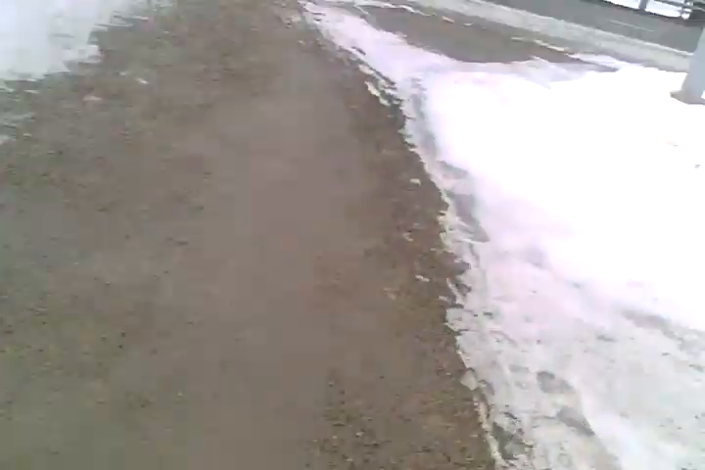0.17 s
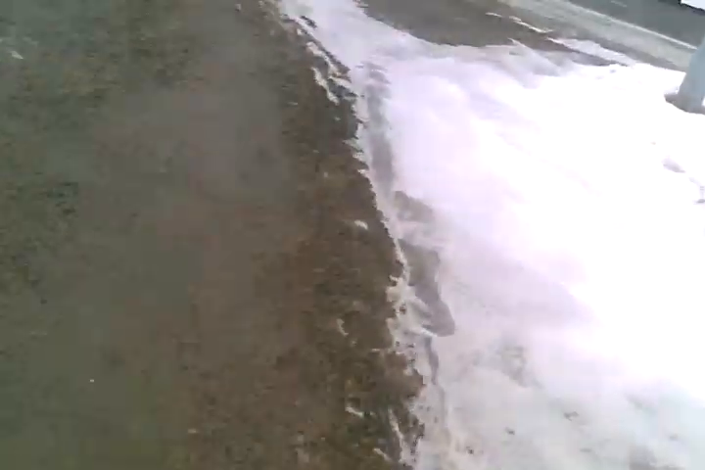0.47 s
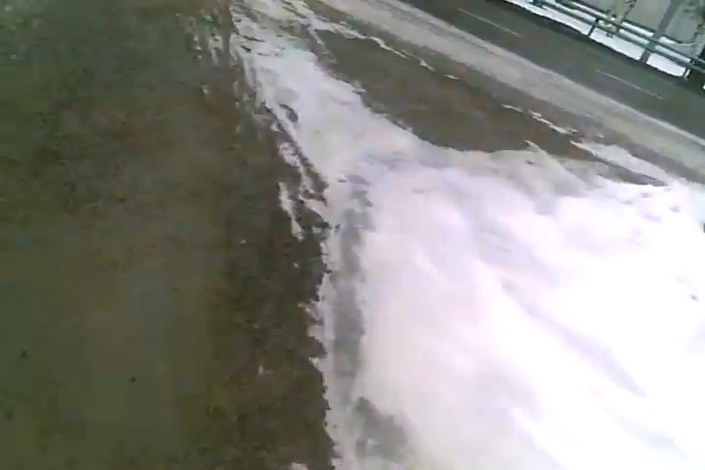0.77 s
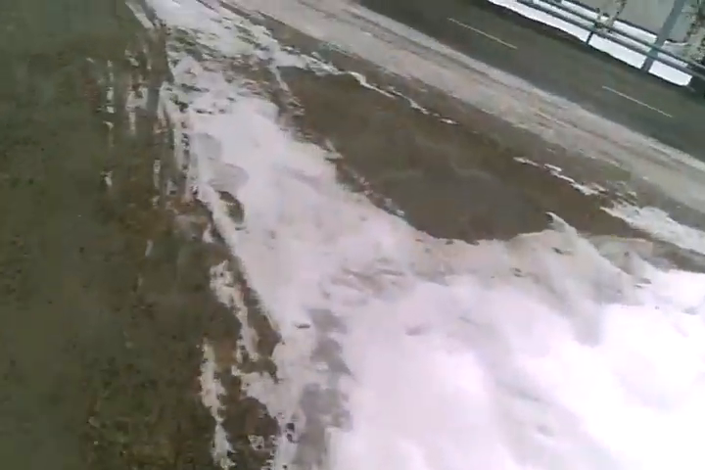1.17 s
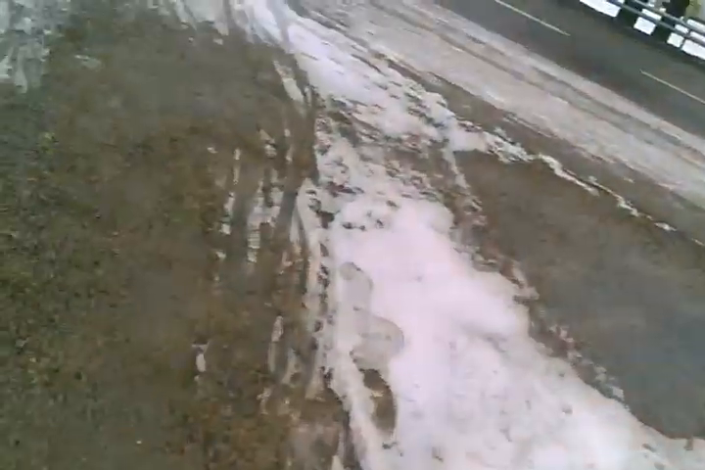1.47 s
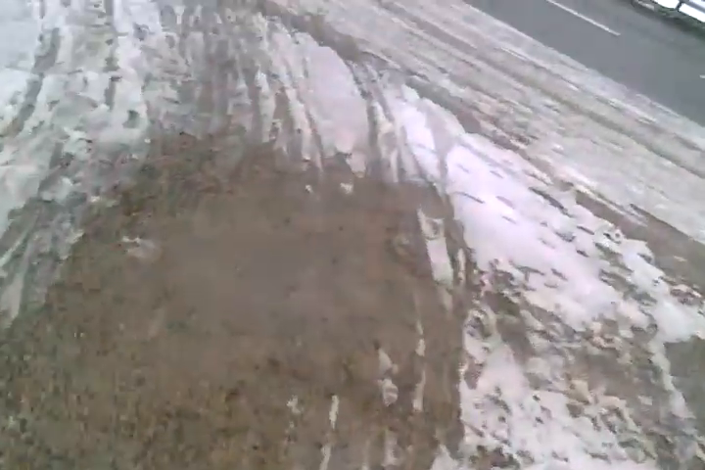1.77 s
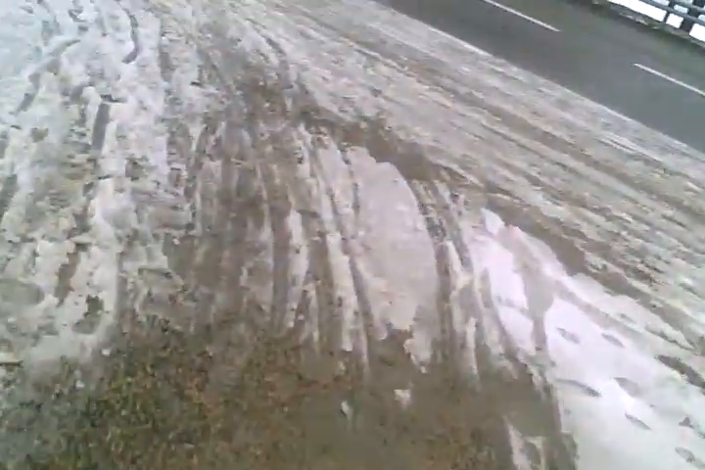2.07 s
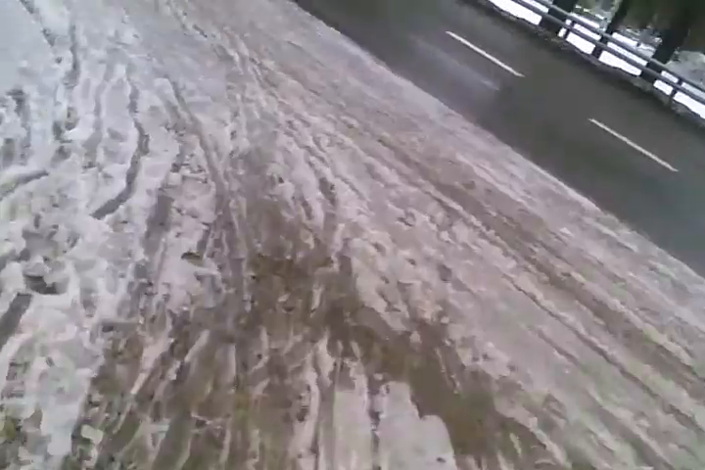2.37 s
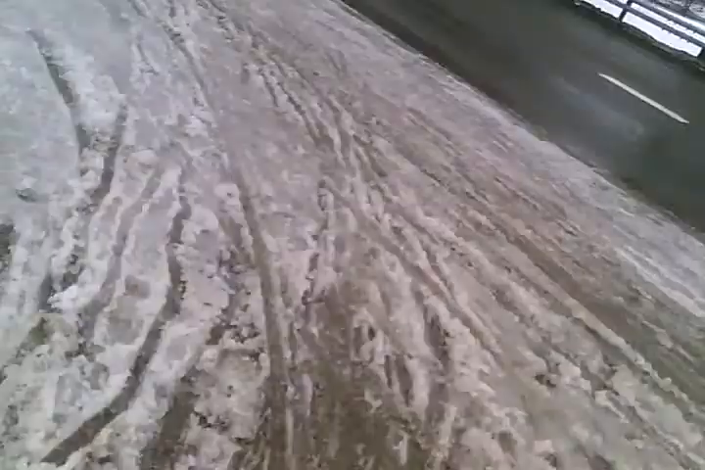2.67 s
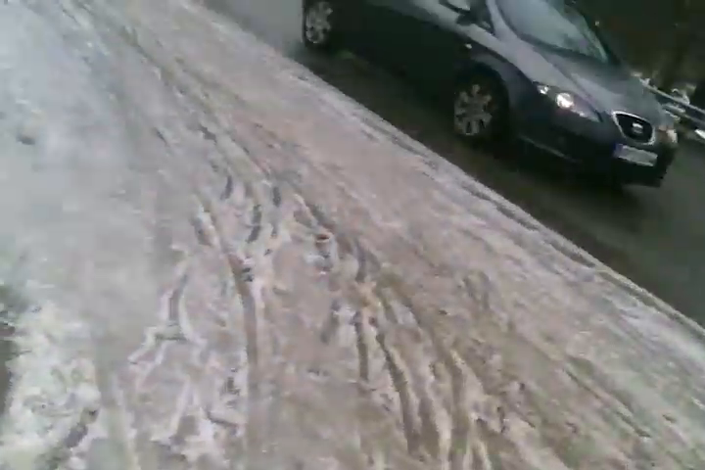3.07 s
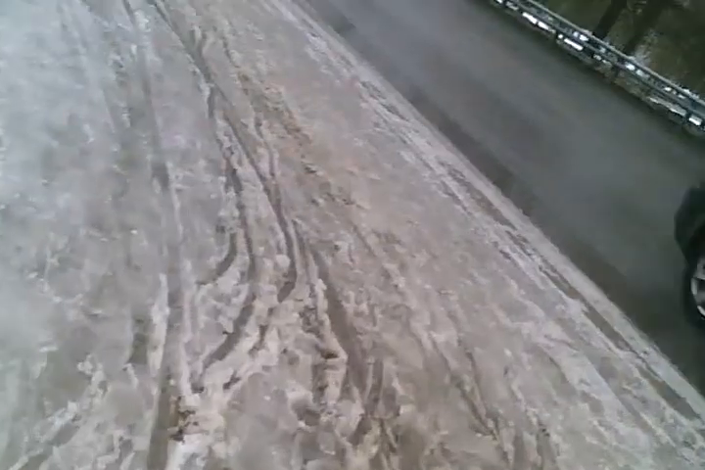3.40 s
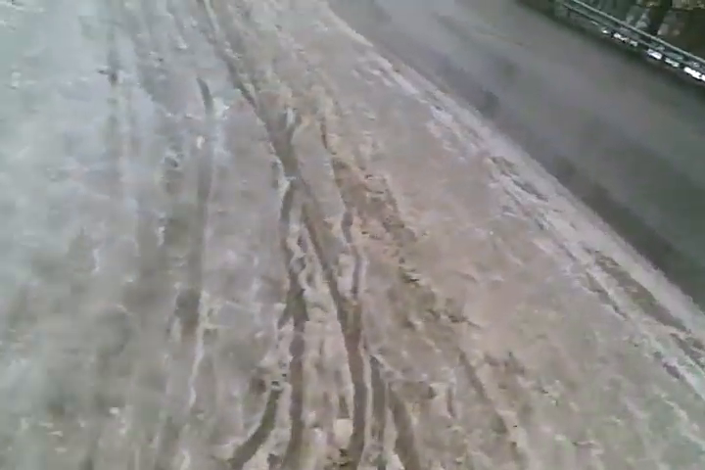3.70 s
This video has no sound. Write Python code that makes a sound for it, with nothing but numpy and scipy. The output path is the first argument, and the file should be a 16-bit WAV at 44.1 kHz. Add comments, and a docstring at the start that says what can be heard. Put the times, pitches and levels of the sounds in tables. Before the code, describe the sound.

A bicycle rolls over gritty, slushy ground with dense crackling, popping stones and rapid bumpy thumps; after midway a car's tyre roar swells past on the wet road, amid metallic clanks, heard close from a shaking bike-mounted microphone.

```python
"""Gritty asphalt and frozen slush beside a wet road: a bicycle on studded tyres, heard by a camera riding on it.
Studs crackle as shaped clicks and noise; flicked grit, popping stones and low slush knocks ring for milliseconds,
and slush crunches as dull noise bursts. The shaking mount thumps in pressure dips; a loose part clanks in
decaying modes. A car comes alongside: coloured noise for tyre roar and spray, a wavering sine for its low
engine hum. Shaped low noise carries the rumble of the frame and the air."""
import sys
import numpy as np
from scipy import signal
from scipy.fft import rfft, irfft
from scipy.io import wavfile
from scipy.ndimage import uniform_filter1d

SR = 44100
rng = np.random.default_rng(int(sys.argv[2]) if len(sys.argv) > 2 else 0)


def store_wav(level_fs):
    """Save 16-bit WAV to argv[1]."""
    pcm = np.round(np.clip(np.atleast_2d(level_fs), -1, 1) * 32767)
    wavfile.write(sys.argv[1], SR, pcm.T.astype(np.int16))


N = 169344  # 3.84 s

# Every colour table gives a relative spectral shape; the filtered noise is then set to rms 1.
# rumble of the frame and the air: (frequency [Hz], density [dB per Hz])
RUMBLE_COLOUR = [(15, -8.5), (30, 0.5), (48, 1), (70, -2.5), (100, -13.5), (150, -14), (250, -19.5),
                 (500, -30), (1000, -60.5)]
# rumble fader: (time [s], level [dB])
RUMBLE_LEVEL = [(0, -28), (.6, -25), (.95, -22), (1.3, -30.5), (2.2, -27.5), (3.0, -26.5), (3.4, -21),
                (3.84, -22.5)]

# the car's tyre roar: (frequency [Hz], density [dB per Hz])
ROAR_COLOUR = [(150, -4.5), (330, 0), (480, -6), (700, -1), (950, 2), (1300, -0.5), (1600, 0.5), (1900, 0),
               (2250, -3), (2700, -13.5), (3400, -17), (4500, -27), (9000, -39.5)]
# roar fader as the car nears: (time [s], level [dB])
ROAR_LEVEL = [(0, -46), (1, -38.5), (1.9, -34), (2.3, -28.5), (2.65, -22), (3.0, -25), (3.3, -22),
              (3.6, -20.5), (3.84, -23)]
# spray from the wet road: (frequency [Hz], density [dB per Hz])
SPRAY_COLOUR = [(2500, -4), (4000, -2.5), (5000, -15), (5600, 4.5), (6200, -1), (7000, 10), (7700, 0.5),
                (8700, 5.5), (9500, -14.5)]
# spray fader: (time [s], level [dB])
SPRAY_LEVEL = [(0, -58), (1.9, -56), (2.4, -46.5), (2.7, -36.5), (3.05, -40), (3.5, -34), (3.84, -40)]
ENGINE_HZ, ENGINE_DB, DOPPLER = 92.9, -24, .05  # Doppler as a fraction of the pitch
PASSES_S, PASS_LENGTH_S = 3.55, 0.435

# crackle of studs on grit: (frequency [Hz], density [dB per Hz])
GRIT_COLOUR = [(300, -10.5), (600, -7.5), (1200, -4.5), (1600, -0.5), (1900, 2.5), (2200, -3), (2550, -13),
               (3100, -10), (3500, -7), (3850, -0.5), (4150, 0), (4700, -11.5), (5300, -11), (6000, -18),
               (6900, -9), (7700, -15.5), (8700, -14), (9500, -31.5)]
# fader shared by the crackle and the flicked grit: (time [s], level [dB])
GRIT_LEVEL = [(0, -32), (.6, -33.5), (1.2, -31.5), (1.7, -31.5), (2.25, -30), (2.7, -32.5), (3.1, -29.5),
              (3.4, -27.5), (3.84, -25)]
GRAINS_PER_S, GRAIN_SPREAD_DB, SCRUB_DB = 2200, 4.5, -1.5
GRIT_PATCHY_DB, GRIT_PATCH_HZ = 2, 30.22
FLICKS_PER_S, FLICK_DB, FLICK_SPREAD_DB = 130, 2.5, 3
FLICK_HZ, FLICK_OCTAVES, FLICK_T60_S = 2970, 0.67, 0.0054  # octaves either side of the centre

# soft thumps of the shaking mount: (time [s], swell level before trim [dB], contact length [s])
MOUNT_THUMPS = [(0.025, -10, 0.0022), (0.0944, -8.5, 0.0052), (0.1325, -9.5, 0), (0.193, -9.5, 0.0036),
                (0.2617, -8.5, 0.0032), (0.302, -6.5, 0), (0.3737, -6.5, 0), (0.4341, -9, 0.0052),
                (0.5021, -9, 0), (0.5387, -8.5, 0.0046), (0.6065, -8, 0.0067), (0.6746, -8.5, 0),
                (0.7405, -8.5, 0.003), (0.8075, -9.5, 0.0032), (0.8498, -5, 0), (0.9113, -3.5, 0.0014),
                (0.9821, -6, 0.004), (1.0173, -6, 0.00028), (1.0843, -5.5, 0.002), (1.1518, -5.5, 0.0048),
                (1.1885, -6.5, 0.0013), (1.256, -4, 0.0017), (1.2931, -5.5, 0.0044), (1.3622, -4, 0.0039),
                (1.397, -3, 0), (1.4631, -3.5, 0.00055), (1.5018, -3, 0.0019), (1.5631, -4.5, 0),
                (1.6017, -5.5, 0.0016), (1.6353, -4, 0.0053), (1.7089, -3.5, 0.00051),
                (1.7388, -4.5, 0.0021), (1.776, -4, 0.0012), (1.8122, -4.5, 0.0015), (1.8778, -8.5, 0),
                (1.9119, -5.5, 0), (1.9515, -8, 0.0014), (2.0176, -5.5, 0.00084), (2.054, -6.5, 0.003),
                (2.0938, -6, 0.00085), (2.192, -7.5, 0.0025), (2.2288, -9, 0.0015), (2.2652, -5.5, 0.0022),
                (2.328, -7.5, 0.0027), (2.3716, -7.5, 0.0022), (2.4018, -9.5, 0), (2.4706, -8, 0.0055),
                (2.5094, -8, 0.0012), (2.5404, -6.5, 0.0035), (2.5751, -8, 0.0026), (2.614, -9, 0.0021),
                (2.6824, -9.5, 0), (2.72, -7, 0.0014), (2.753, -5.5, 0), (2.7886, -9, 0),
                (2.8608, -3, 0.002), (2.926, -6.5, 0.0033), (2.9937, -8.5, 0.0053), (3.0372, -9, 0.00055),
                (3.0928, -7.5, 0.006), (3.1344, -5.5, 0.0016), (3.2691, -10.5, 0.0012),
                (3.5223, -9.5, 0.00079), (3.5855, -7.5, 0.0033), (3.695, -6.5, 0), (3.762, -9, 0.00072)]
# scuff in each thump: (frequency [Hz], density [dB per Hz])
SCUFF_COLOUR = [(120, -9.5), (300, 0), (480, -3), (700, -10), (1400, -35.5)]
THUMP_TRIM_DB, THUMP_RISE_S, THUMP_FALL_S, THUMP_LOW_HZ = 0.5, 0.0027, 0.0045, 8.6
CUSP_DB, CUSP_S, BOUNCE_SPAN = -19, 0.00038, 0.67  # span in contact lengths either side
SCUFF_DB, SCUFF_S = -30.5, 0.0028

# stones popping under the tyre and, in the last three rows, low knocks of crunching slush:
# (time [s], level before trim [dB], pitch [Hz], relative treble before trim [dB])
POPS_AND_KNOCKS = [(.1511, -15, 3100, -7), (.337, -19, 3950, -8), (.369, -15.5, 1900, -6),
                   (.4728, -16, 1900, -4.5), (.5332, -6.5, 1740, -12), (.536, -14, 1800, -12),
                   (.606, -0.5, 1750, -21), (.6614, -13, 1930, -7.5), (.703, -17, 1760, -6),
                   (.8051, -12.5, 1950, -9), (.8667, -4.5, 1940, -11.5), (1.0233, -10, 1640, -8),
                   (1.2161, -4, 1700, -29), (1.2620, -1.5, 1930, -17), (1.273, -2, 1900, -17),
                   (1.3655, -6, 1750, -25), (1.4088, -5, 2030, -26), (1.4336, -9.5, 2100, -16),
                   (1.5609, -6.5, 1610, -13.5), (1.6516, -5, 1760, -22), (1.6761, -7, 1650, -15),
                   (1.8322, -26.5, 3850, 5.5), (1.9739, -4, 1800, -16.5), (2.0282, -0.5, 1780, -19.5),
                   (2.040, -12.5, 3940, -2.5), (2.1827, -19, 3910, -4), (2.1989, -9.5, 2150, -6),
                   (2.2325, -15, 1830, -18), (2.2515, -2.5, 1740, -15), (2.2715, -5, 1800, -14),
                   (2.2897, -11.5, 1660, -5.5), (2.3134, -15, 1360, -14), (2.3825, -7.5, 2050, -9),
                   (2.4299, -10.5, 1880, -4), (3.467, -13.5, 1930, -4), (3.635, -1, 1060, -22),
                   (3.8081, -1, 1260, -29), (3.811, -1, 1160, -26)]
POP_TRIM_DB, POP_BODY_DB, POP_T60_S = 0.5, -3.5, 0.0054
POP_EDGE_TRIM_DB, POP_EDGE_HZ, POP_EDGE_T60_S = 6.5, 3940, 0.0049
CRUMBLE_DB, CRUMBLE_S = -18, 0.0041
GRAIN_ATTACK_S = .0002  # for pops, knocks and flicked grit alike

# crunches of frozen slush: (time [s], level [dB], decay time constant [s])
SLUSH_CRUNCHES = [(1.2625, -23, 0.014), (3.6325, -13, 0.0035), (3.8092, -10, 0.0059)]
# slush noise: (frequency [Hz], density [dB per Hz])
CRUNCH_COLOUR = [(300, -18), (700, -6), (1150, -3), (1500, -3), (2200, -15), (3500, -25), (9000, -46)]

# clanks of a loose part over the ruts, each with a short tick; at 3.2377 s the tick is a harsh overload burst:
# (time [s], ring level before mode levels [dB], full ring t60 [s], tick or burst level [dB],
# tick or burst pitch [Hz])
LOOSE_CLANKS = [(1.350, -25, 0.054, -39, 8000), (1.601, -15, 0.032, -30, 3900),
                (2.7448, -11, 0.04, -33, 7000), (2.976, -3, 0.045, -22, 6700),
                (3.0598, -6, 0.037, -18, 8200), (3.1515, -3.5, 0.031, -24, 8300),
                (3.2354, 3, .012, -13, 8250), (3.2377, 1, 0.013, 5, 5515), (3.4862, -8.5, 0.02, -33, 4000),
                (3.6040, -3, 0.04, -23, 8100), (3.668, -9, 0.04, -20, 4000), (3.7325, -5, .05, -28, 7000)]
# modes of the loose part: (centre pitch [Hz], share of the full ring t60 [ratio], relative level [dB])
LOOSE_PART_MODES = [(1868, 0.97, 3.5), (1744, 0.8, -7.5), (2110, 1, -7), (3860, .8, -25)]
TICK_GRIT_DB, TICK_S, CLANK_ATTACK_S = -2, 0.00061, 0.00072

CLIP_LEVEL, TOP_HZ = 0.75, 9500  # clip in full scale


def undb(db):
    """Decibels to gain."""
    return 10 ** (np.asarray(db) / 20)


def unit(x):
    """Scale to rms 1."""
    return x / np.sqrt(np.mean(x ** 2))


def noise():
    """White noise for the whole scene."""
    return rng.standard_normal(N)


def fader(points):
    """Gain over time, drawn straight in dB between (time [s], level [dB]) points."""
    return undb(np.interp(np.arange(N) / SR, *np.array(points, float).T))


def colour(x, points):
    """Shape a sound with a causal minimum-phase filter and set it to rms 1."""
    hz, db = np.array(points, float).T
    f = np.maximum(np.fft.rfftfreq(N, 1 / SR), 1)
    gain = undb(np.interp(np.log(f), np.log(hz), db))
    # fold the cepstrum onto positive time so the filter never sounds early
    cepstrum = irfft(np.log(gain), N)
    cepstrum[1:N // 2] *= 2
    cepstrum[N // 2 + 1:] = 0
    return unit(irfft(rfft(x) * np.exp(rfft(cepstrum)), N))


def walk(rate):
    """Smooth random drift with rms 1, heading for a new value at the given rate [Hz]."""
    k = max(int(SR / rate), 2)
    steps = np.repeat(rng.standard_normal(N // k + 1), k)
    return unit(uniform_filter1d(steps, k)[:N])


def ring(t, hz, t60):
    """One decaying mode, down 60 dB after t60 seconds."""
    return np.sin(2 * np.pi * hz * t) * np.exp(-np.log(1000) * t / t60)


def grain(t, hz, t60):
    """A few cycles of a decaying mode with a rounded start."""
    return ring(t, hz, t60) * (1 - np.exp(-(t / GRAIN_ATTACK_S) ** 2))


def add(out, start, sound):
    """Mix a sound in at a time [s]."""
    i = int(np.clip(start * SR, 0, N - 1))
    out[i:i + len(sound)] += sound[:N - i]


def rumble():
    """Low shaking of the frame and the air: deep coloured noise riding its fader."""
    return colour(noise(), RUMBLE_COLOUR) * fader(RUMBLE_LEVEL)


def tyre_roar():
    """The car's tyres roar as coloured noise that wavers slightly and swells as the car nears."""
    return colour(noise(), ROAR_COLOUR) * fader(ROAR_LEVEL) * undb(1.3 * walk(12))


def spray():
    """Spray from the wet road hisses as bright noise with a faster flutter in level."""
    return colour(noise(), SPRAY_COLOUR) * fader(SPRAY_LEVEL) * undb(1.3 * walk(25))


def engine():
    """A wavering sine hum, loudest alongside, whose pitch sinks by Doppler as the car passes."""
    along = (np.arange(N) / SR - PASSES_S) / PASS_LENGTH_S
    distance = np.hypot(along, 1)  # 1 at the closest point
    hz = ENGINE_HZ * (1 - DOPPLER * along / distance + 0.013 * walk(11))
    hum = unit(np.sin(2 * np.pi * np.cumsum(hz) / SR))
    return hum * undb(ENGINE_DB + 2 * walk(7.1)) / distance ** 2


def studs():
    """Dense tiny clicks of studs on grit over a smooth scrub of rubber, both swelling in patches."""
    size = undb(GRAIN_SPREAD_DB * np.minimum(rng.exponential(size=N), 5))
    struck = rng.random(N) < GRAINS_PER_S / SR
    clicks = struck * size * rng.choice([-1, 1], N)
    contact = unit(clicks) + undb(SCRUB_DB) * noise()
    patches = undb(GRIT_PATCHY_DB * walk(GRIT_PATCH_HZ))
    return colour(contact * patches, GRIT_COLOUR) * fader(GRIT_LEVEL)


def flicks():
    """Loose grit flicked by the studs: random short grains, each with its own pitch and size."""
    t, out = np.arange(SR // 80) / SR, np.zeros(N)
    candidates = 1500  # thinned at random to the average rate
    for when, keep, size, pitch in rng.random((candidates, 4)):
        if keep < FLICKS_PER_S * N / SR / candidates:
            hz = FLICK_HZ * 2 ** (FLICK_OCTAVES * (2 * pitch - 1))
            db = FLICK_DB + FLICK_SPREAD_DB * min(-np.log(1 - size), 4)
            add(out, when * N / SR, undb(db) * grain(t, hz, FLICK_T60_S))
    return out * fader(GRIT_LEVEL)


def thumps():
    """The mount swells into a pressure dip with sharp cusps and a dry scuff; a lasting contact has two cusps."""
    t, pressure, contact = np.arange(N) / SR, np.zeros(N), np.zeros(N)
    for at, db, length in MOUNT_THUMPS:
        near = np.abs(t - at) < .05
        u = t[near] - at
        outside = np.maximum(np.abs(u) - length / 2, 0)
        swell = np.exp(-outside / np.where(u < 0, THUMP_RISE_S, THUMP_FALL_S))
        from_cusp = np.abs(np.abs(u) - length * BOUNCE_SPAN)
        cusp = np.exp(-from_cusp / CUSP_S)
        pressure[near] -= undb(db) * swell + undb(CUSP_DB) * cusp
        contact[near] += np.exp(-(from_cusp / SCUFF_S) ** 2)
    scuff = undb(SCUFF_DB) * contact * colour(noise(), SCUFF_COLOUR)
    low_cut = signal.butter(1, THUMP_LOW_HZ, "high", fs=SR, output="sos")
    return undb(THUMP_TRIM_DB) * signal.sosfilt(low_cut, pressure) + scuff


def pops_and_knocks():
    """Stone pops and low slush knocks snap at their own pitch, then crumble for a few milliseconds."""
    t, out = np.arange(SR // 25) / SR, np.zeros(N)
    for at, db, hz, treble_db in POPS_AND_KNOCKS:
        sparse = rng.standard_normal(len(t)) * (rng.random(len(t)) < .5)
        push = undb(CRUMBLE_DB) * sparse * np.exp(-t / CRUMBLE_S)
        push[0] = 1  # the snap itself, ahead of the crumble
        body = undb(POP_BODY_DB) * grain(t, hz, POP_T60_S)
        edge = undb(treble_db + POP_EDGE_TRIM_DB) * grain(t, POP_EDGE_HZ, POP_EDGE_T60_S)
        add(out, at, undb(db + POP_TRIM_DB) * signal.fftconvolve(push, body + edge))
    return out


def crunches():
    """Lumps of frozen slush collapse with short dull bursts of noise."""
    t, envelope = np.arange(SR // 10) / SR, np.zeros(N)
    for at, db, decay in SLUSH_CRUNCHES:
        add(envelope, at, undb(db) * np.exp(-t / decay))
    return envelope * colour(noise(), CRUNCH_COLOUR)


def clanks():
    """A loose part clanks in slightly detuned modes, with a short tick or, once, a harsh overload burst."""
    t, out = np.arange(SR // 10) / SR, np.zeros(N)
    for at, db, t60, tick_db, tick_hz in LOOSE_CLANKS:
        tone = np.zeros(len(t))
        for hz, share, mode_db in LOOSE_PART_MODES:
            detuned = hz * (1 + .003 * rng.standard_normal())
            tone += undb(mode_db) * ring(t, detuned, t60 * share)
        tone *= 1 - np.exp(-t / CLANK_ATTACK_S)
        buzz = np.sin(2 * np.pi * tick_hz * t) + undb(TICK_GRIT_DB) * rng.standard_normal(len(t))
        tick = buzz * (t / TICK_S * np.exp(1 - t / TICK_S)) ** 2
        add(out, at, undb(db) * tone + undb(tick_db) * tick)
    return out


def scene():
    """The bicycle and the car at one microphone."""
    car = tyre_roar() + spray() + engine()
    tyres = studs() + flicks() + pops_and_knocks() + crunches()
    bike = rumble() + thumps() + clanks()
    return (car + tyres + bike)[None]


def record(dry):
    """The camera clips peaks above its limit, then cuts the top end steeply."""
    top_cut = signal.ellip(10, .2, 80, TOP_HZ, fs=SR, output="sos")  # .2 dB ripple, 80 dB stopband
    return signal.sosfilt(top_cut, np.clip(dry, -CLIP_LEVEL, CLIP_LEVEL))


dry = scene()
out = record(dry)
store_wav(out)
```